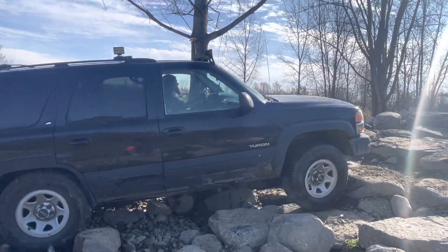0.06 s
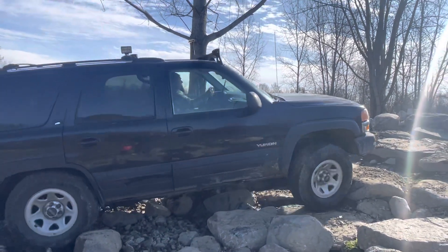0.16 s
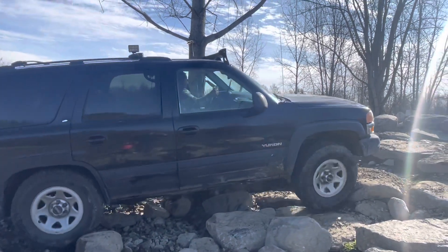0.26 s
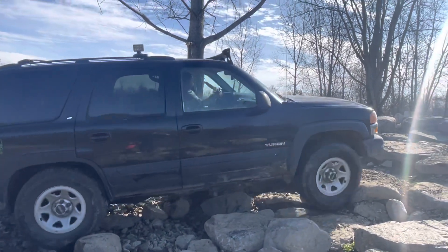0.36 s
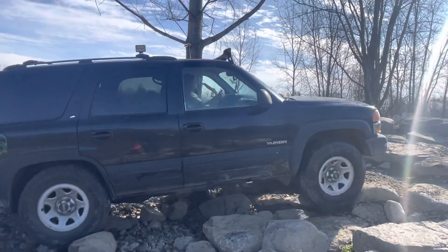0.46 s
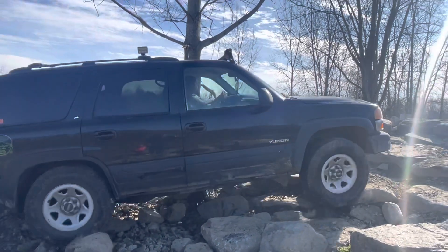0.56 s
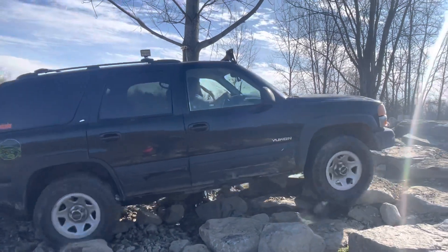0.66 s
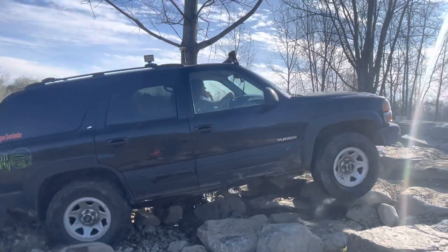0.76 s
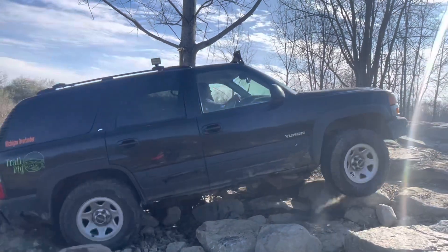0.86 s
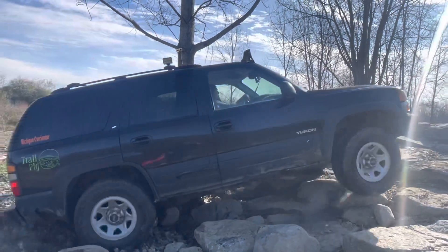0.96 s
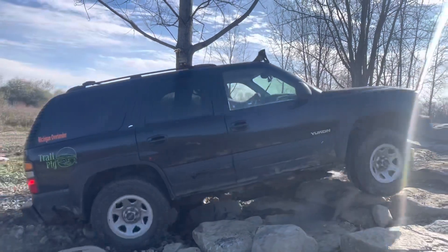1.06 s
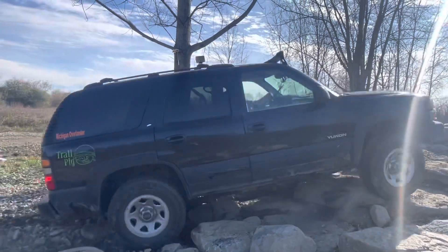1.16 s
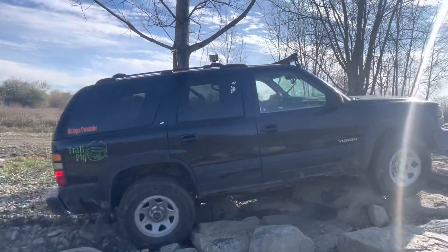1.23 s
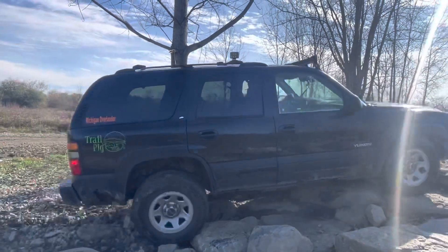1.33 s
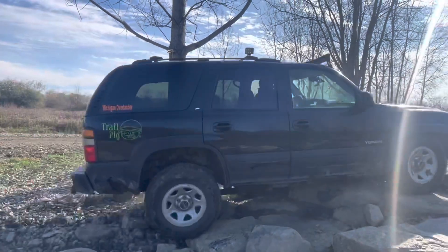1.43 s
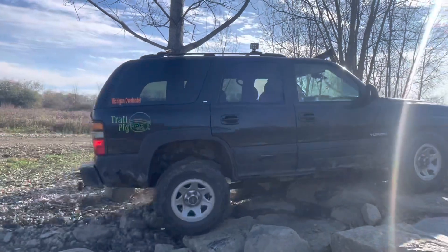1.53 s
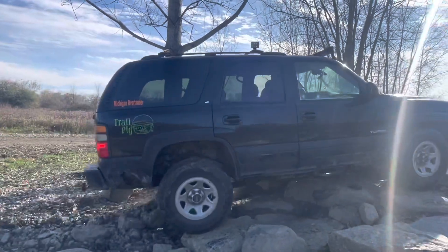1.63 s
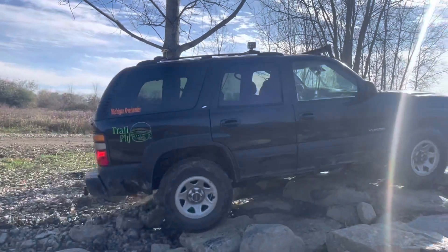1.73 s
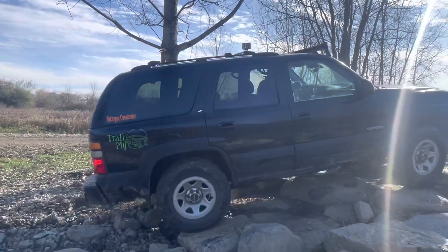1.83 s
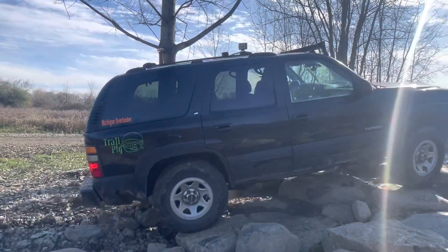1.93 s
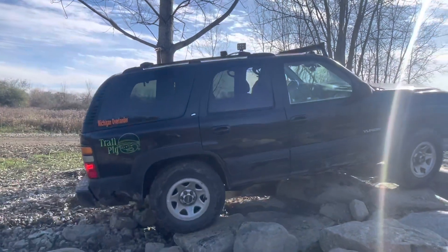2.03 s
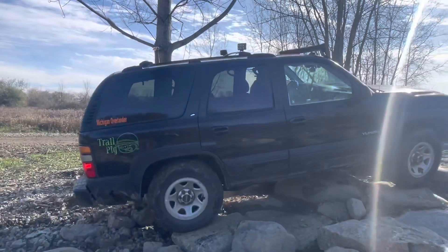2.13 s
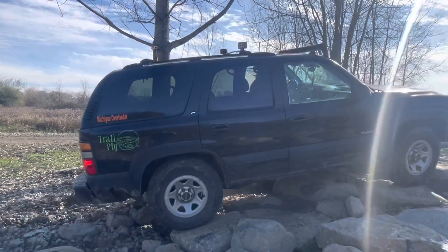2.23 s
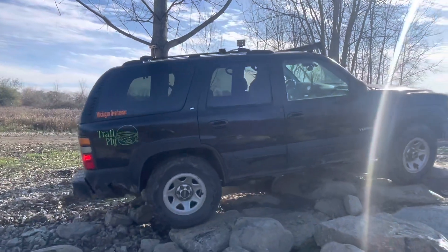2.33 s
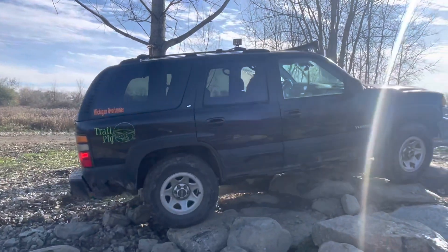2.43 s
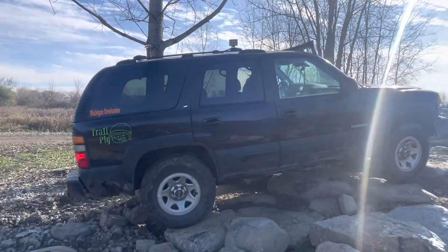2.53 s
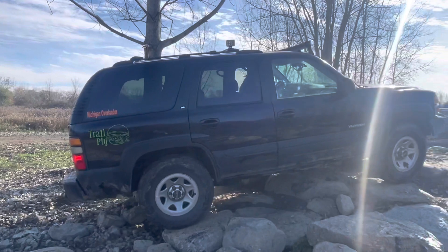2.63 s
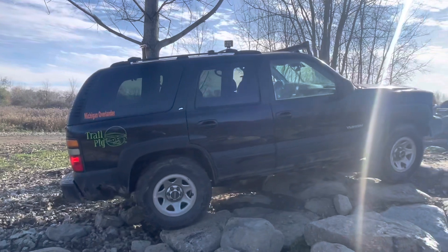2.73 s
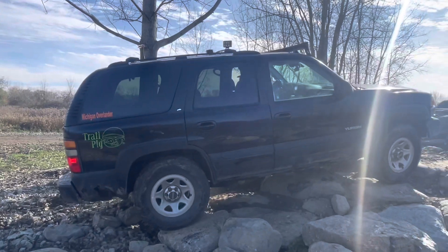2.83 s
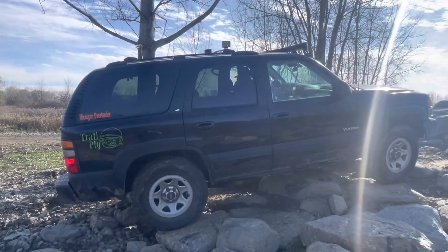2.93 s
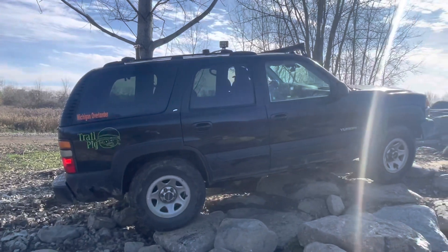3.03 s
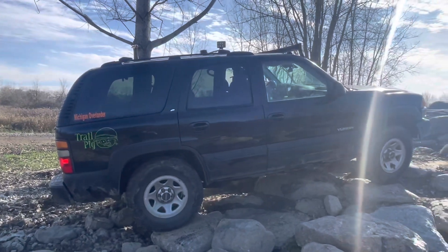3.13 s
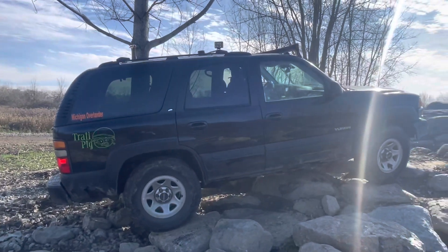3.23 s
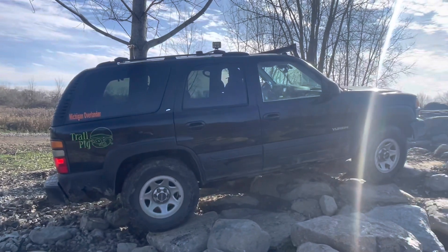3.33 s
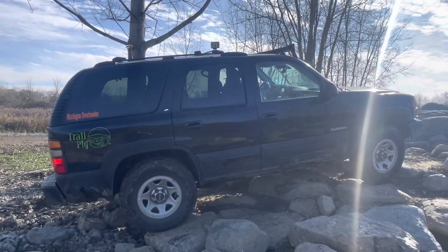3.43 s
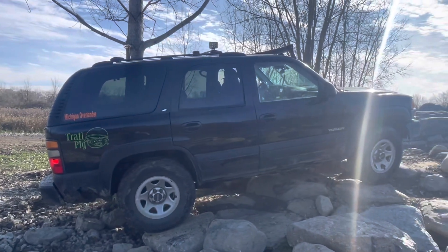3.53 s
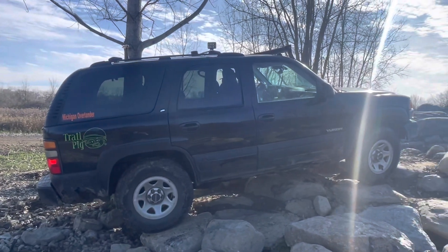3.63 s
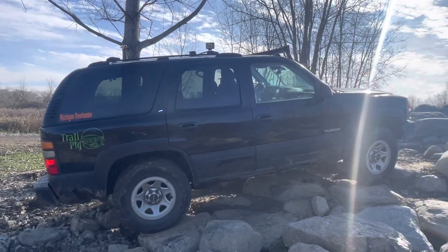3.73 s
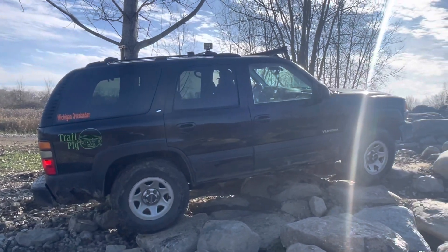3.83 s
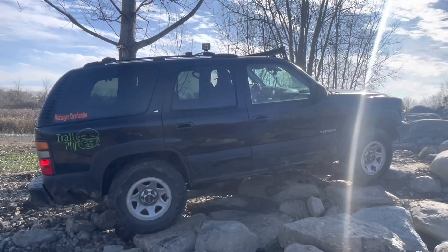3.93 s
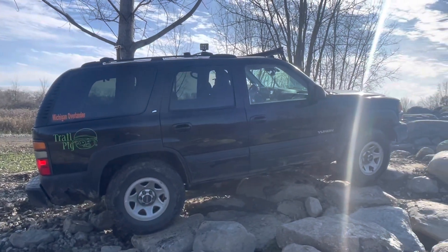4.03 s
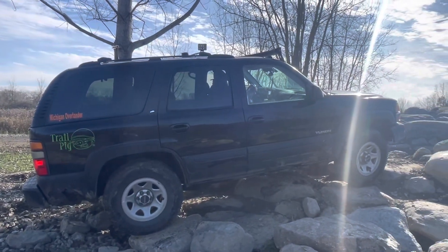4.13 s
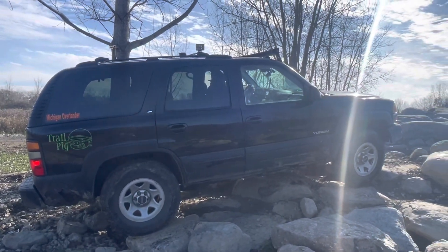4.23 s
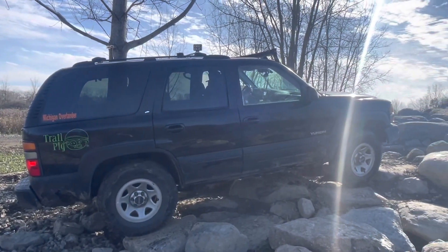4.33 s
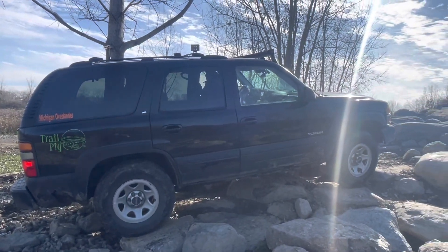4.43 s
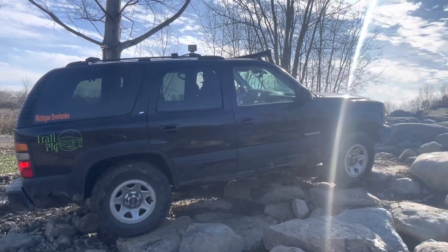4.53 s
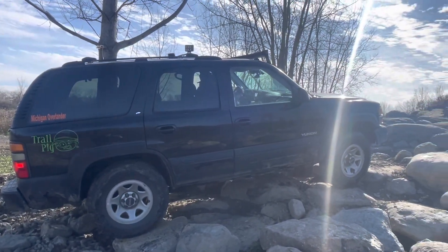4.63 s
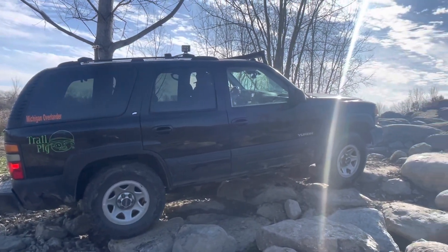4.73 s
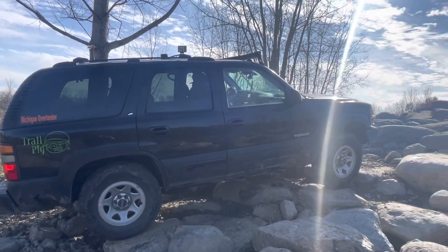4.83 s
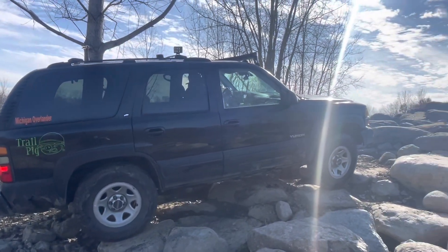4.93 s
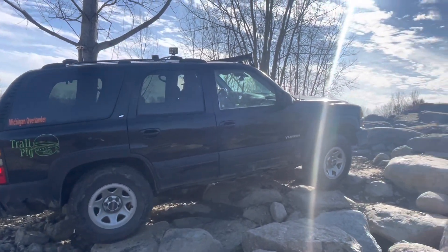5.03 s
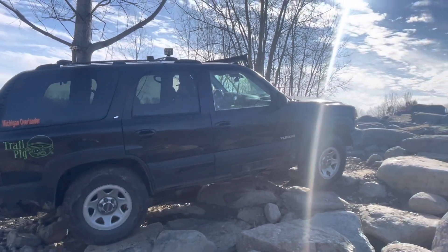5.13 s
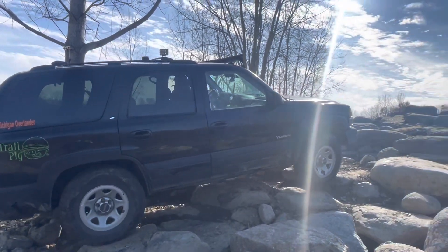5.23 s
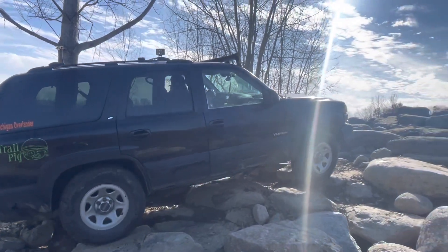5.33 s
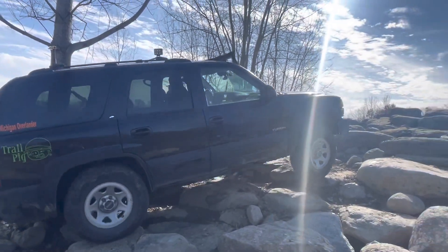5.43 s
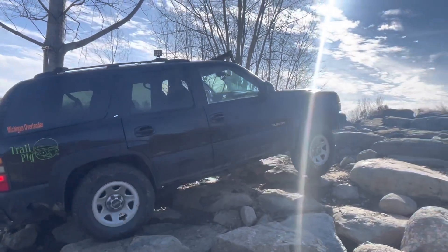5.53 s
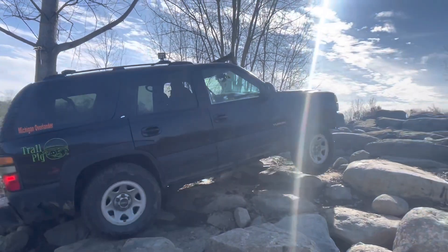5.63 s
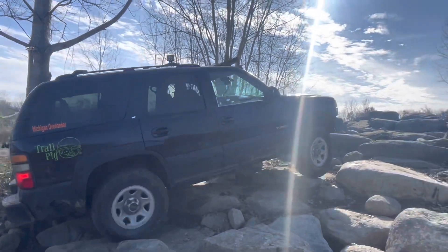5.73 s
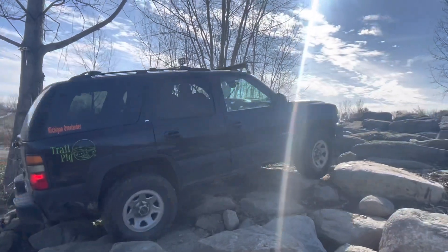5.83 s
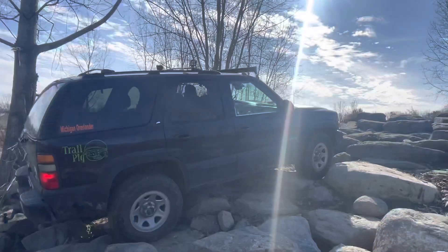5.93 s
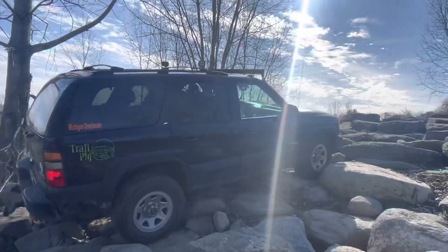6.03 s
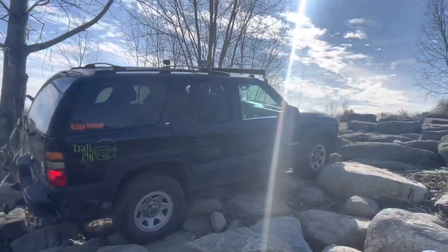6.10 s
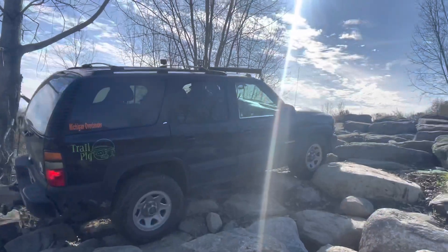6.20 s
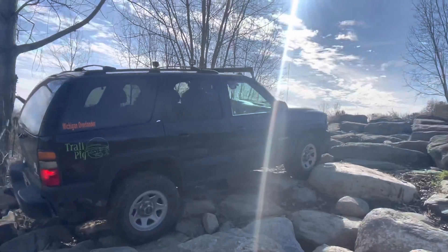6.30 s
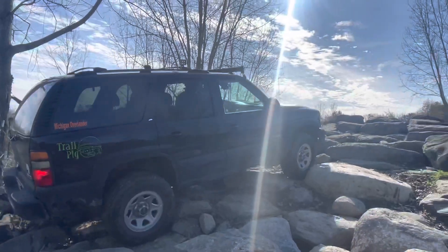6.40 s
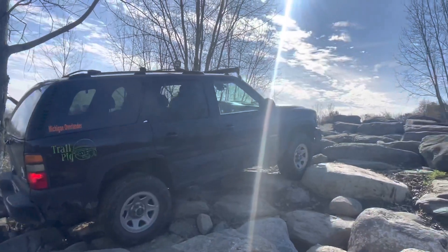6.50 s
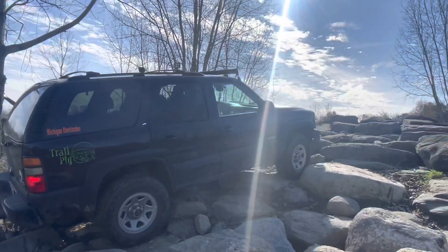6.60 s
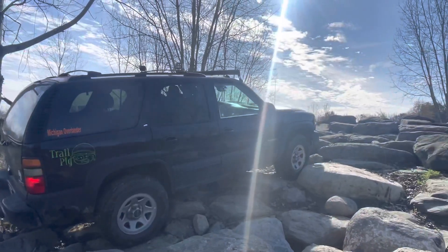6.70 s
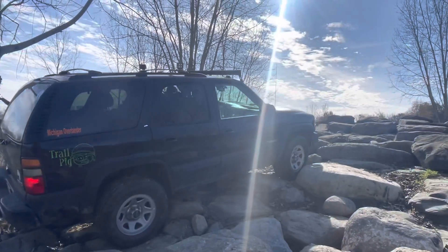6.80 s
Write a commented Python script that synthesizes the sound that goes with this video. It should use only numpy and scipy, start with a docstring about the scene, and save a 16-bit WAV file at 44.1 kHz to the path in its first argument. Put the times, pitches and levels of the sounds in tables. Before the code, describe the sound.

Outdoors, a few metres away, a large SUV engine growls up in one strong rev and falls away while its tyres grind over rock, stones crack and the underbody thumps. An uneven, burbling idle follows for a few seconds. Then the engine pushes again more softly, with a low rumble, a faint whine and small tyre squeaks and scrapes, before easing back to idle.

```python
"""A V8 engine drives an SUV over boulders a few metres away: a hard rev, a loping idle, a gentler push.
Its uneven firings excite the resonances of the exhaust pipe, which rise as the gas heats up.
Speed and load govern the growl and bark of the exhaust and the rush of fan and belts.
Beneath, the tyres crack stones, scrape and squeak over rock and crush grit; the suspension knocks."""
import sys
import numpy as np
from scipy import signal
from scipy.fft import rfft, irfft, next_fast_len
from scipy.io import wavfile
from scipy.ndimage import uniform_filter1d

SR = 44100
rng = np.random.default_rng(int(sys.argv[2]) if len(sys.argv) > 2 else 0)


def transcribe(u):
    """Save the signal u as a 16-bit wav file named by the first command-line argument.

    u: samples, shape (n,) or (channels, n), limited to [-1, 1]; the rate is SR.
    q: integer samples, one column per channel.
    """
    v = np.clip(np.atleast_2d(u).T, -1, 1)
    q = np.round(v * 32767).astype(np.int16)
    wavfile.write(sys.argv[1], SR, q)


N = 302526
TIME = np.arange(N) / SR

# Engine speed before flywheel smoothing. Each row: time in seconds, speed in rpm.
ENGINE_SPEED = [(0.0, 1835), (0.122, 2090), (0.369, 3135), (0.553, 3730), (0.717, 3755), (0.974, 1991),
                (1.2, 1342), (1.657, 738), (1.997, 620), (2.333, 607), (2.641, 773.3), (2.897, 768),
                (3.419, 663.6), (4.201, 670), (4.652, 1067), (5.058, 1165), (5.426, 1566), (5.886, 913.2),
                (6.325, 611.6), (6.86, 605.7)]
# Engine load. Each row: time in seconds, load (1 is a hard push).
ENGINE_LOAD = [(0, 1.156), (.66, 1.177), (.78, 0.84), (.87, 0.79), (.96, 1), (1.08, 0.23), (1.22, 0.25),
               (1.65, 0.015), (2.1, 0.019), (2.7, 0.27), (3.4, 0.17), (4.2, 0.3), (4.5, 0.67), (5.0, 0.87),
               (5.33, 1.115), (5.7, 0.65), (6.25, 0.15), (6.86, 0.16)]
# Cylinders in firing order. Each row: relative pulse level in dB, relative gas puff level in dB.
CYLINDER_LEVELS = [(4, 11), (0.8, 3), (-2, 0.5), (3, 6.5), (0.5, -3.5), (1.5, 9.5), (2.6, 7.5), (-2.3, 2)]
# Cylinder inequality. Each row: time in seconds, multiplier of the pulse levels in dB.
IMBALANCE = [(0, -0.2), (.3, 1.8), (.6, 1), (1, 3.3), (1.6, 1.5), (4.2, 1.73), (5, 1.16), (5.4, 1.35),
             (6.86, 0.64)]
FAR_BANK, FAR_BANK_S = [0, 0, 1, 0, 1, 1, 0, 1], .00077   # cylinders marked 1 have a longer pipe
SCATTER_DB, OVERRUN_SCATTER_DB = 1.5, 1.0   # spread of strength; extra per octave/s of falling revs
LATE_S_PER_DB, WANDER_S, IDLE_RPM = .00003, .0002, 600   # weak firings lag; timing wanders most at idle

# Gas heat. Each row: time in seconds, speed of sound as a multiple of that at idle.
SOUND_SPEED = [(0, 1.17), (.3, 1.23), (.6, 1.33), (1, 1.14), (1.6, 1), (4.2, 1), (5, 1.03), (5.4, 1.06),
               (6.86, .98)]
# Low, middle and high pipe modes at idle. Each row: frequency in Hz, bandwidth in Hz, gain in dB.
BOOM_MODES = [(51.2, 17, 2), (120, 83.5, 0), (172.15, 20.6, 4.12), (223.7, 47, -21.5), (298.6, 14, -10.5),
              (387.4, 47, -12.5), (436, 62, -23)]
GROWL_MODES = [(295.7, 7.8, 15), (366, 19.4, 1.5), (414, 37, -0.5)]
BARK_MODES = [(613.3, 22.6, 3.5), (743, 18, 10.5), (822, 3.6, 6.5), (950, 360, -27)]
# Silencer modes. Each row: frequency in Hz, bandwidth in Hz, gain in dB.
SILENCER_MODES = [(300.77, 27, 3.5), (399, 63, -6), (624, 30, -16), (750, 20.5, -5.5)]
# Low exhaust note. Each row: time in seconds, level in dB.
BOOM_LEVEL = [(0.0, -6.5), (0.09, -5), (0.71, -11), (0.82, -25), (0.84, -13.5), (0.95, -14.5), (1.24, -32),
              (1.28, -24), (1.36, -37), (1.43, -28), (1.6, -32.5), (2.81, -22), (3.19, -25.5),
              (4.11, -24.5), (4.17, -22.5), (4.2, -28.5), (4.24, -21), (4.43, -15), (4.97, -11.5),
              (5.2, -11), (5.44, -10.5), (6.31, -26), (6.84, -22), (6.86, -34)]
# Exhaust rumble, engine-bay rasp and hiss. Each row: frequency in Hz, relative spectral density in dB.
RUMBLE_SPECTRUM = [(20, -41), (45, -7), (80, -6), (180, -15), (300, 5), (600, -47.5)]
RASP_SPECTRUM = [(530, 3.5), (900, 5), (1140, -1.5), (1310, -3.5), (1420, 4.5), (1530, 1.5), (1750, -8.5),
                 (2040, -1.5), (2300, -11.5), (3200, -19.5), (4160, -91), (7040, -120)]
HISS_SPECTRUM = [(1650, -20.5), (2800, -2), (4700, -8), (5530, -1), (6790, -12.5), (8300, -10.5),
                 (9110, -9.5), (10200, -27), (11200, -18), (12400, -17), (16200, -59), (22000, -120)]
# Whines of belt-driven parts. Each row: cycles per firing, relative level in dB.
BELT_ORDERS = [(22.5, -16), (29.5, -3), (32.3, -3), (36, -5.5)]
# Thin tones, probably steering pump and intake air. Each row: time in seconds, pitch in Hz, level in dB.
PUMP_WHINE = [(2.2, 1240, -80), (2.85, 1616, -61), (3.05, 1457, -68), (3.3, 1316, -63), (4.05, 1310, -66),
              (4.46, 1443, -60), (5.0, 1434, -61), (5.38, 1480, -42), (5.7, 1465, -85)]
INTAKE_WHISTLE = [(4.25, 4490, -79), (4.35, 4550, -63), (4.6, 4950, -75), (4.95, 5196, -64),
                  (5.25, 5330, -56), (5.5, 5487, -82)]
# Each law: unloaded level in dB at the reference speed, dB per octave of speed, dB per unit of load.
REFERENCE_RPM = 1000
GROWL_LAW, BARK_LAW = (-55.5, 0.31, 29.15), (-62.5, 0.61, 30.8)
THROAT_LAW, CHUFF_LAW = (-56, -11, 30), (-46, -6, 19)
RASP_LAW, HISS_LAW, WHINE_LAW = (-61, 9.92, 17.15), (-66.5, 12.7, 6.7), (-68, 1, 8)

# Cracking stones, and one short low tock at 1.134 s made the same way. Each row: start in seconds, relative
# level in dB, pitch in Hz, brightness in dB.
STONE_CRACKS = [(0.783, -39, 1300, -18), (0.848, -22.5, 1290, 4), (0.92, -23, 1390, -4),
                (0.941, -27, 852, -8), (0.984, -27, 700, -23), (1.053, -29.5, 2980, 9),
                (1.076, -16.5, 1630, -6), (1.091, -27, 1911, 23), (1.134, -30, 437, -18),
                (1.194, -31.5, 2160, 8), (1.22, -27, 1880, -11), (1.257, -28.5, 1944, 0),
                (1.304, -28.5, 2180, -24), (1.413, -22.5, 1590, -20), (1.519, -36, 2870, 1),
                (1.704, -33, 5300, 12), (1.8, -37.5, 1210, -11), (2.031, -28.5, 1330, 13),
                (2.458, -52, 2274, -10), (5.471, -25.5, 2080, -34), (5.492, -28.5, 2010, -30),
                (5.545, -31.5, 1300, 15), (5.729, -33, 1714, -4.5), (5.937, -34.5, 1830, -15),
                (5.967, -29, 3030, -29), (6.099, -37, 1340, -3), (6.351, -40.5, 2820, 3),
                (6.723, -40.5, 1240, 16)]
# Tyre slides. Each row: start in seconds, nominal length in seconds, level in dB, brightness in dB.
TYRE_SLIDES = [(0.677, 0.064, -19, -8.5), (0.917, 0.078, -25.5, 0.5), (1.405, 0.089, -26.5, -7),
               (1.94, 0.27, -59, 13.5), (5.49, 0.033, -32, -20), (5.926, 0.13, -40, -15),
               (6.158, 0.068, -54, -25), (6.29, 0.12, -48.5, -32), (6.466, 0.058, -45.5, 8.5)]
# Modes of grinding rock and of the underbody. Each row: frequency in Hz, bandwidth in Hz, gain in dB.
ROCK_MODES = [(860, 370, 5.5), (1460, 95, 5), (1655, 120, 3), (2040, 125, 5), (2570, 770, -4.5),
              (4194, 42, 3), (4640, 410, -8.5), (5530, 660, -3), (5970, 580, -3), (9200, 820, -12)]
UNDERBODY_MODES = [(195, 102, 1.5), (365.6, 23.3, 15.5), (366, 36, 14.5), (571, 17, 0.5), (750, 200, -1)]
# Suspension jolts. Each row: start in seconds, relative level in dB.
JOLTS = [(0.715, -19.5), (0.785, -32.5), (0.826, -37.5), (0.853, -54), (0.934, -33), (0.983, -43),
         (1.131, -41), (1.409, -37), (1.437, -35), (5.751, -36), (6.07, -37.5), (6.422, -42.5)]
# Rubber slipping on stone. Each row: centre in seconds, length in seconds, pitch in Hz, level in dB.
SLIPS = [(1.452, 0.035, 4400, -27), (5.856, 0.027, 1480, -39), (5.49, 0.063, 1980, -35.5),
         (6.188, 0.067, 2200, -47), (6.2, 0.048, 3300, -69)]
# Crushed grit. Each row: frequency in Hz, relative spectral density in dB.
GRIT_SPECTRUM = [(200, 10), (500, 4.5), (900, 1.5), (2000, -4.5), (3000, -10.5), (5000, -11), (7000, -17.5),
                 (9100, -17), (11200, -16.5), (13000, -56)]
# Crunch of rolling and deep rumble of climbing. Each row: time in seconds, level in dB.
ROLLING_LEVEL = [(0, -24), (.6, -32), (.88, -23.5), (1.2, -37.5), (1.42, -39), (1.62, -47), (2.05, -49),
                 (2.25, -56.5), (4.3, -55), (5.0, -45.5), (5.33, -30.5), (5.62, -43), (6.3, -45),
                 (6.65, -51.5), (6.86, -52.5)]
HEAVE_LEVEL = [(0, -40), (.6, -56), (.8, -26), (1.0, -25), (1.3, -42), (1.8, -46), (4.9, -50), (5.2, -20),
               (5.5, -17), (5.8, -38.5), (6.3, -55), (6.86, -53)]

# Stereo width. Each row: frequency in Hz, side minus mid in dB.
STEREO_WIDTH = [(60, -6), (250, -15), (600, -5), (1200, -2), (2500, 1), (5000, -2), (9000, 1.5),
                (12000, 6.5)]
# Microphone balance. Each row: frequency in Hz, left minus right in dB.
MIC_TILT = [(60, 0.4), (150, 2.5), (300, 0.5), (650, -8), (1300, -4), (2600, 2), (5000, 6), (9000, 0)]


def firings():
    """Four-stroke cycle: eight firings in two turns. Gives the running count, pulses and gas puffs."""
    rpm = engine_rpm()
    count = 5.45 + np.cumsum(rpm) / 15 / SR   # rpm / 15 firings a second, starting in mid-cycle
    firing = np.arange(int(count[0]) + 1, int(count[-1]) + 1)
    cylinder = firing % len(CYLINDER_LEVELS)
    times = np.interp(firing, count, TIME) + FAR_BANK_S * np.array(FAR_BANK)[cylinder]
    imbalance, = in_time(IMBALANCE, times)
    slowing = np.maximum(-np.gradient(np.log2(rpm)) * SR, 0)
    scatter_db = SCATTER_DB + OVERRUN_SCATTER_DB * np.interp(times, TIME, slowing)
    pulse_db, puff_db = np.array(CYLINDER_LEVELS)[cylinder].T
    time_draw, pulse_draw, puff_draw = rng.standard_normal((len(firing), 3)).T
    times = times - LATE_S_PER_DB * scatter_db * pulse_draw
    wander = WANDER_S * (IDLE_RPM / np.interp(times, TIME, rpm)) ** 2 * time_draw
    pulses = clicks(times + wander, from_db(imbalance * pulse_db + scatter_db * pulse_draw))
    puffs = clicks(times, from_db(puff_db + scatter_db * puff_draw))
    return count, pulses, puffs


def engine_rpm(flywheel_s=.082):
    """Flywheel inertia smooths every change of speed."""
    return uniform_filter1d(in_time(ENGINE_SPEED)[0], size=int(flywheel_s * SR), mode="nearest")


def loudness(law):
    """Amplitude follows a power law in engine speed and grows exponentially with load."""
    base_db, speed_db, load_db = law
    octaves = np.log2(engine_rpm() / REFERENCE_RPM)
    return from_db(base_db + speed_db * octaves + load_db * in_time(ENGINE_LOAD)[0])


def exhaust(pulses, puffs):
    """Forced resonance: pulses ring the pipe modes, and turbulent gas roughens the upper ones."""
    level = from_db(in_time(BOOM_LEVEL)[0])
    boom = level * even(band(pipe(pulses, BOOM_MODES), 37.6, 209.4, order=2))
    gas = even(fade(puffs, 0.04) * stereo_noise())
    beats = even(puffs)
    beats = rms_one(beats - .6 * np.roll(beats, 410) + .45 * np.roll(beats, 655))   # comb filter
    growl_ring = pipe(even(pulses) + .35 * beats + .12 * gas, GROWL_MODES, heat_exponent=.708)
    growl = loudness(GROWL_LAW) * even(band(growl_ring, 312, 564, order=5))
    bark_ring = pipe(beats + .2 * gas, BARK_MODES, heat_exponent=.3)
    bark = loudness(BARK_LAW) * even(band(bark_ring, 590, 1050))
    rumble = from_db(-29) * level * rms_one(colour(stereo_noise(), RUMBLE_SPECTRUM))
    return boom + widen(growl + bark + rumble)


def pipe(drive, modes, heat_exponent=1):
    """Pipe modes rise with the speed of sound: hot gas makes the pipe's own clock run faster."""
    lead = int(120 / ENGINE_SPEED[0][1] * SR)   # one extra engine cycle, so the pipe starts out ringing
    drive = uniform_filter1d(np.concatenate([drive[..., :lead], drive], axis=-1), size=8)
    clock = np.cumsum(np.pad(in_time(SOUND_SPEED)[0], (lead, 0), "edge") ** heat_exponent)
    steps = np.arange(int(clock[-1]))
    ringing = [resonate(np.interp(steps, clock, x), modes) for x in np.atleast_2d(drive)]
    return np.array([np.interp(clock[lead:], steps, x) for x in ringing])


def throat(count):
    """The silencer's resonances select clean harmonics of the firing rate."""
    harmonics = sum(np.sin(2 * np.pi * k * count) for k in range(3, 15))
    return loudness(THROAT_LAW) * even(band(resonate(harmonics, SILENCER_MODES), 258, 880))


def chuffs(count, anchor_s=3.33, width_firings=.7):
    """Amplitude modulation of noise: once a cycle, one cylinder puffs softly from the tailpipe."""
    cycle = len(CYLINDER_LEVELS)
    firings_off = (count - np.interp(anchor_s, TIME, count) + cycle / 2) % cycle - cycle / 2
    swell = np.exp(-(firings_off / width_firings) ** 2)
    breath = rms_one(band(rng.standard_normal(N), 385, 460, order=4))
    return loudness(CHUFF_LAW) * swell * breath


def engine_bay(count, puffs):
    """Firings modulate the broadband rush; belt-driven parts whine at multiples of the firing rate."""
    air = rms_one((1 + 0.14 * even(fade(puffs, 0.016))) * stereo_noise())
    beats = engine_rpm() / REFERENCE_RPM * even(puffs)
    machinery = rms_one(reflections(air + beats, decay_s=.011) + .9 * air)
    rasp = loudness(RASP_LAW) * even(colour(machinery, RASP_SPECTRUM))
    hiss = loudness(HISS_LAW) * even(colour(machinery, HISS_SPECTRUM))
    waver = rms_one(band(stereo_noise(), 10, 22, order=2))
    tones = sum(from_db(db) * np.sin(2 * np.pi * cycles * count) for cycles, db in BELT_ORDERS)
    whine = loudness(WHINE_LAW) * tones * (1 + 0.35 * waver)
    return widen(rasp + hiss + whine)


def reflections(x, decay_s):
    """Close echoes off body and rocks interfere, leaving narrow spectral peaks and dips."""
    t = TIME[:SR // 12]
    response = rms_one(stereo_noise(len(t)) * np.exp(-t / decay_s)) / np.sqrt(len(t))
    return signal.fftconvolve(x, response, axes=1)[:, :N]


def thin_tone(curve):
    """Random phase modulation makes a gliding tone slightly unsteady."""
    hz, db = in_time(curve)
    unsteady = rms_one(band(rng.standard_normal(N), 6, 30, order=2))
    return from_db(db) * np.sin(2 * np.pi * np.cumsum(hz) / SR + .5 * unsteady)


def stones():
    """Brittle fracture: a short burst with a bright edge rings three damped modes of the stone."""
    out, t = np.zeros((2, N + SR)), TIME[:SR // 8]
    for start, db, hz, bright_db in STONE_CRACKS:
        burst = stereo_noise(len(t)) * (np.exp(-t / 0.0028) + 0.15 * np.exp(-t / 0.018))
        ring = rms_one(resonate(burst, [(hz, 400, 0), (hz * 1.22, 450, -3), (hz * 1.91, 500, -9)]))
        crack = ring + from_db(bright_db - 8.5) * rms_one(band(burst, 2760, 9100, order=2))
        i = int(start * SR)
        out[:, i:i + len(t)] += from_db(db + 6.5) * crack / np.abs(crack).max()
    return widen(out[:, :N])


def scrapes():
    """Sliding friction: a tyre drags grains over the rock and excites its resonances."""
    grind = rms_one(resonate(grit(per_s=900, spread_db=3.8), ROCK_MODES))
    edge = band(grind, 5600, 10800, order=1)
    out = 0
    for start, length, db, bright_db in TYRE_SLIDES:
        stroke = np.interp(TIME - start, [-.004, .011, .66 * length, 1.23 * length], [0, 1, 1, 0])
        out = out + from_db(db) * stroke * (grind + (from_db(bright_db) - 1) * edge)
    return widen(out)


def knocks():
    """Impact excitation: suspension jolts ring the underbody modes."""
    starts, db = np.transpose(JOLTS)
    jolts = fade(clicks(starts, from_db(db)), 0.038) * band(stereo_noise(), 185, 435, order=2)
    return widen(from_db(32) * resonate(jolts, UNDERBODY_MODES))


def squeaks():
    """Stick-slip friction drives one narrow resonance for a moment."""
    friction, out = stereo_noise(), 0
    for centre, length, hz, db in SLIPS:
        swell = np.exp(-(2 * (TIME - centre) / length) ** 4)
        out = out + from_db(db) * swell * rms_one(resonate(friction, [(hz, 0.11 * hz, 0)]))
    return widen(out)


def rolling():
    """Many tiny fractures add up to a crunch as the tyres roll over grit."""
    crunch = rms_one(colour(grit(per_s=1200, spread_db=1.5), GRIT_SPECTRUM))
    return widen(from_db(in_time(ROLLING_LEVEL)[0]) * crunch)


def grit(per_s, spread_db):
    """Shot noise: grains break at random instants, in short bursts of uneven size."""
    sizes = from_db(spread_db * np.minimum(rng.exponential(1, (2, N))[0], 4))
    breaks = rng.random(N) < per_s / SR
    return rms_one(fade(sizes * breaks, 0.008) * stereo_noise())


def heave():
    """Low narrow-band noise is heard as a rumble that swells with the climb."""
    return from_db(in_time(HEAVE_LEVEL)[0]) * even(band(rng.standard_normal(N), 38, 83, order=2))


def from_db(db):
    """Amplitude grows tenfold every 20 dB."""
    return 10 ** (np.asarray(db) / 20)


def rms_one(x):
    """Normalisation to unit power."""
    return x / np.sqrt(np.mean(x ** 2) + 1e-20)


def even(x):
    """Division by the running RMS holds the slow level at one and keeps the single beats."""
    power = uniform_filter1d(uniform_filter1d(x * x, size=5300), size=5300)
    return x / np.sqrt(np.abs(power) + 1e-20)


def in_time(rows, t=TIME):
    """Linear interpolation of each column of a curve at the times t."""
    times, *columns = np.transpose(rows)
    return [np.interp(t, times, column) for column in columns]


def stereo_noise(samples=N):
    """Two uncorrelated channels of white noise."""
    return rng.standard_normal((2, samples))


def clicks(times, heights):
    """An impulse train with the given times and heights."""
    return np.bincount(np.clip(np.asarray(times) * SR, 0, N).astype(int), heights, N + 1)[:N]


def fade(x, decay_s):
    """Leaky integration gives each impulse an exponential tail."""
    return signal.lfilter([1], [1, -np.exp(-1 / (decay_s * SR))], x + 1e-18)


def band(x, low_hz, high_hz, order=3):
    """Maximally flat band-pass filtering."""
    sections = signal.butter(order, [low_hz, high_hz], "band", fs=SR, output="sos")
    return signal.sosfilt(sections, x + 1e-18)


def colour(x, spectrum):
    """Spectral shaping by a dB curve read on a log-frequency axis."""
    size = next_fast_len(N)
    bin_hz = np.arange(size // 2 + 1) * SR / size
    hz, db = np.transpose(spectrum)
    gain = from_db(np.interp(np.log(bin_hz + 1), np.log(hz), db))
    return irfft(rfft(x, size) * gain, size)[..., :N]


def resonate(x, modes):
    """Modal superposition: damped resonators add with alternating sign."""
    out = 0
    for k, (hz, width, db) in enumerate(modes):
        radius = np.exp(-np.pi * width / SR)
        feedback = [1, -2 * radius * np.cos(2 * np.pi * hz / SR), radius ** 2]
        ring = (1 - radius ** 2) / 2 * signal.lfilter([1, 0, -1], feedback, x + 1e-18)
        out = out + (-1) ** k * from_db(db) * ring
    return out


def widen(pair):
    """Mid-side stereo: sum and difference give left and right, wider towards the treble."""
    mid, side = pair
    return mid + colour(side, STEREO_WIDTH) * [[1], [-1]]


def scene():
    """Superposition: the pressures of engine, body and tyres add."""
    count, pulses, puffs = firings()
    tailpipe = exhaust(pulses, puffs) + chuffs(count) + throat(count)
    machinery = engine_bay(count, puffs) + thin_tone(PUMP_WHINE) + thin_tone(INTAKE_WHISTLE)
    return tailpipe + machinery + heave() + rolling() + knocks() + stones() + scrapes() + squeaks()


def record(dry, ceiling=.96, cutoff_hz=12200):
    """Each microphone port adds colour, a resonance and a notch; peaks saturate and the top is cut."""
    pair = np.array([colour(x, np.array(MIC_TILT) * [1, share]) for x, share in zip(dry, (.5, -.5))])
    ported = pair + resonate(pair, [(9420, 580, 5.0)])
    notched = signal.lfilter(*signal.iirnotch(10200, Q=7, fs=SR), ported)
    rounded = notched / (1 + (notched / ceiling) ** 8) ** (1 / 8)
    return signal.sosfilt(signal.ellip(10, .3, 80, cutoff_hz, fs=SR, output="sos"), rounded)


dry = scene()
out = record(dry)
transcribe(out)
```